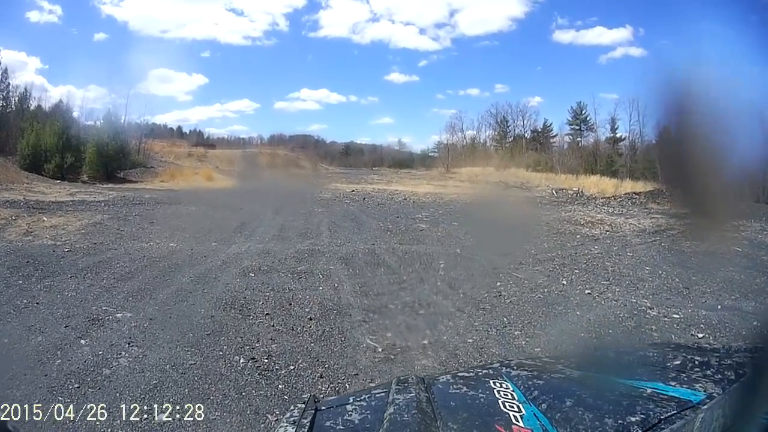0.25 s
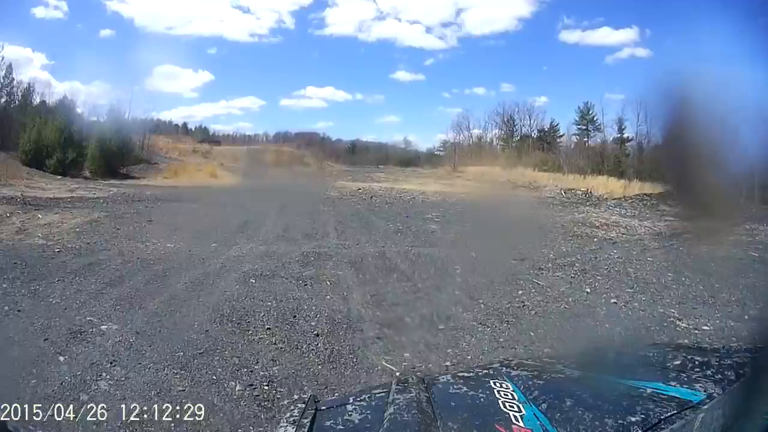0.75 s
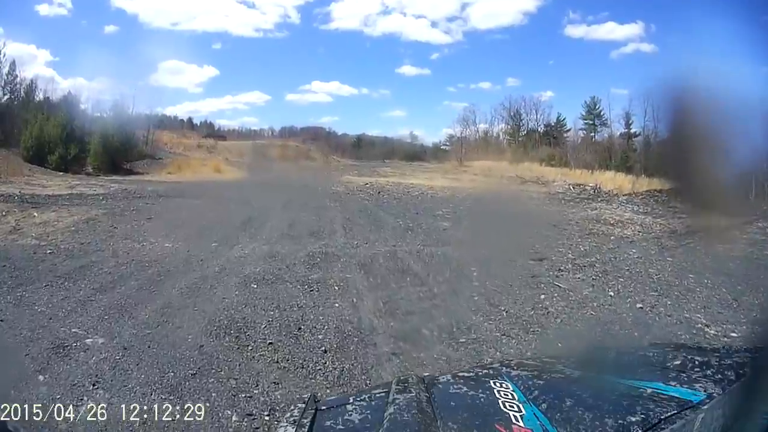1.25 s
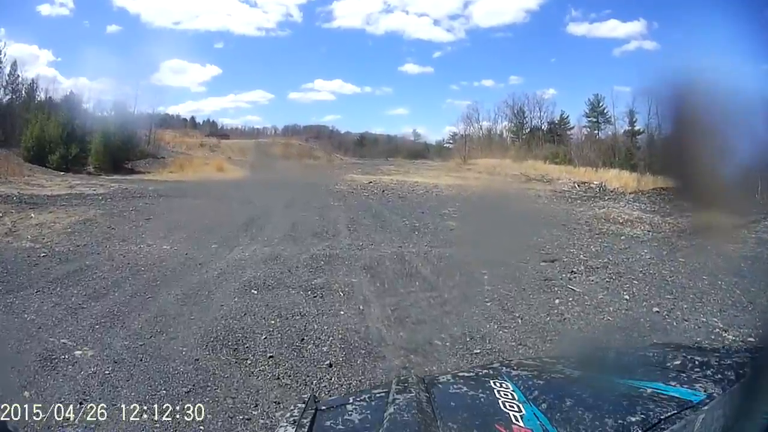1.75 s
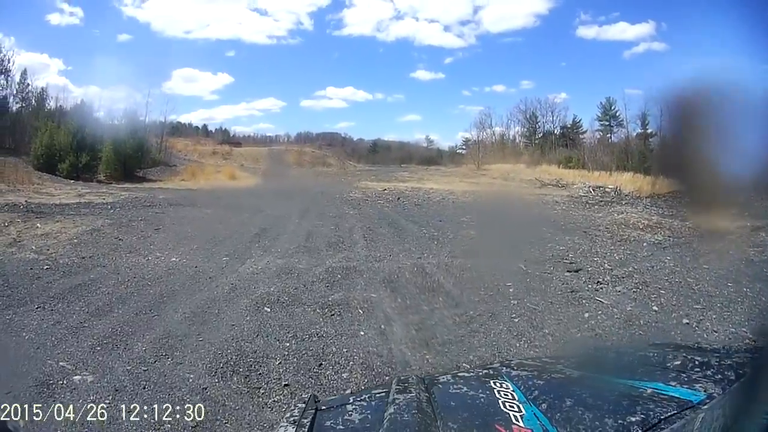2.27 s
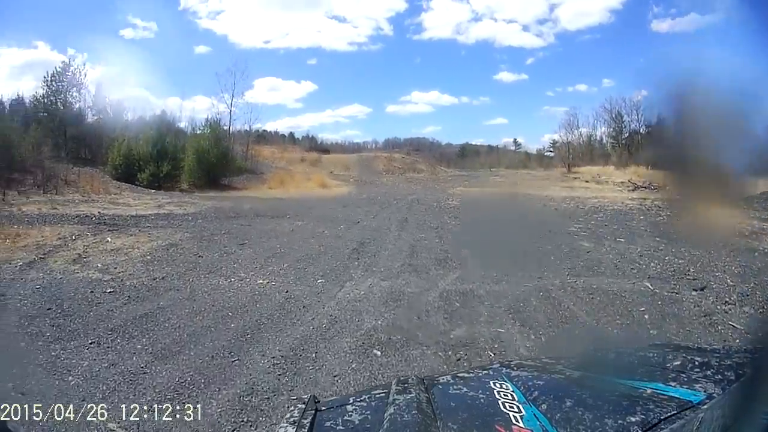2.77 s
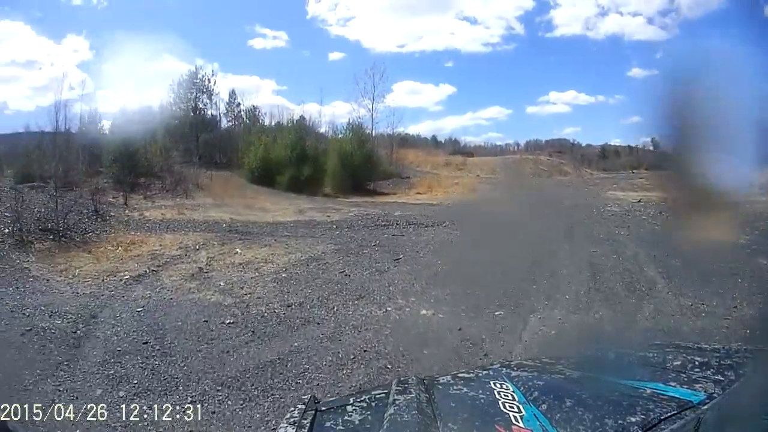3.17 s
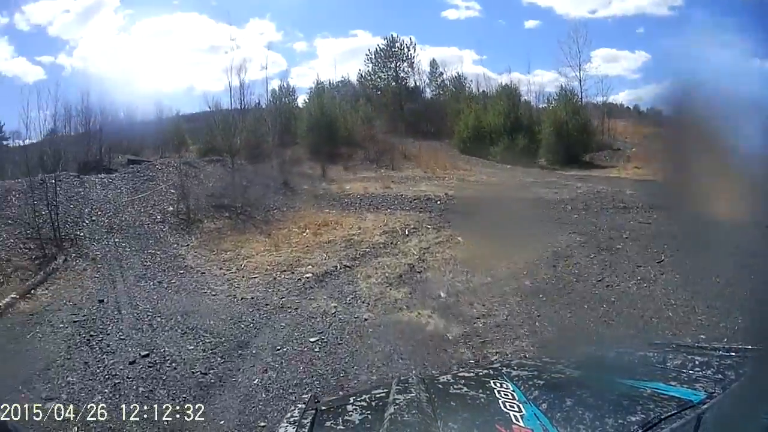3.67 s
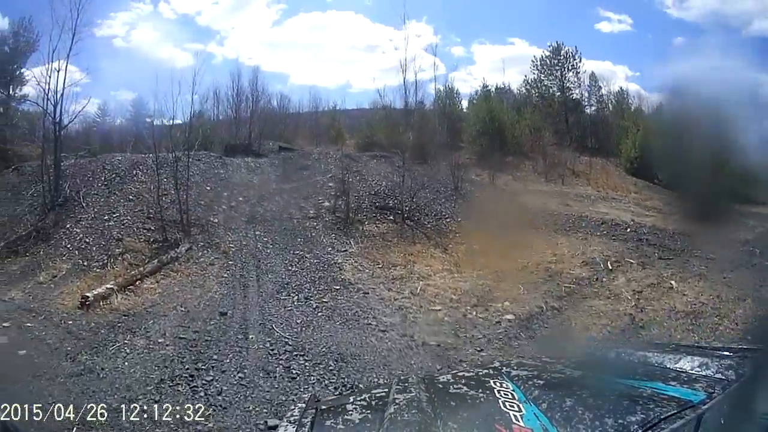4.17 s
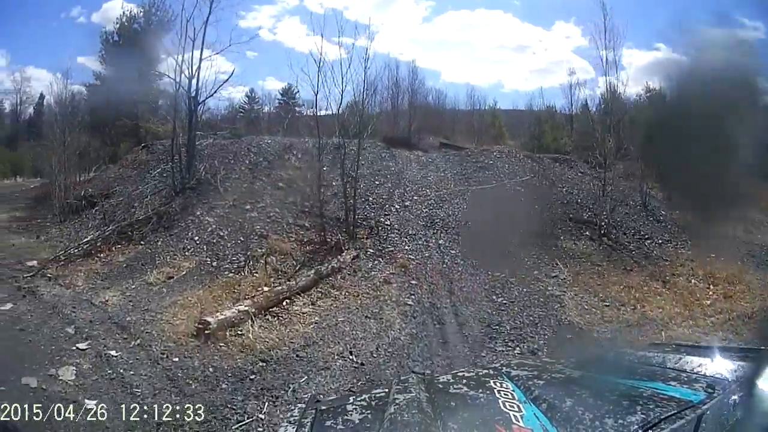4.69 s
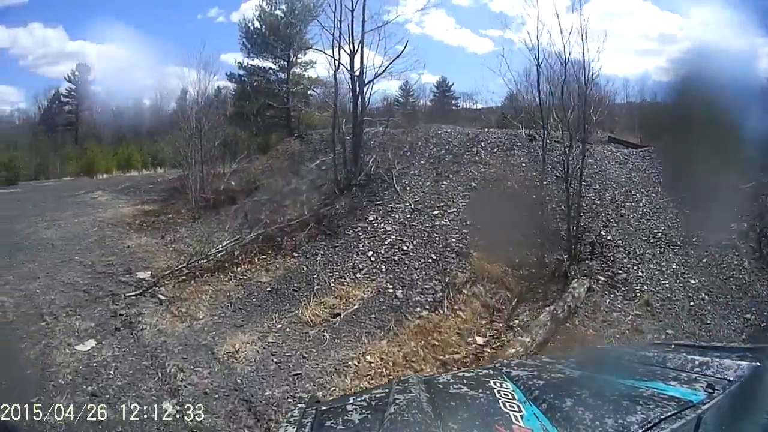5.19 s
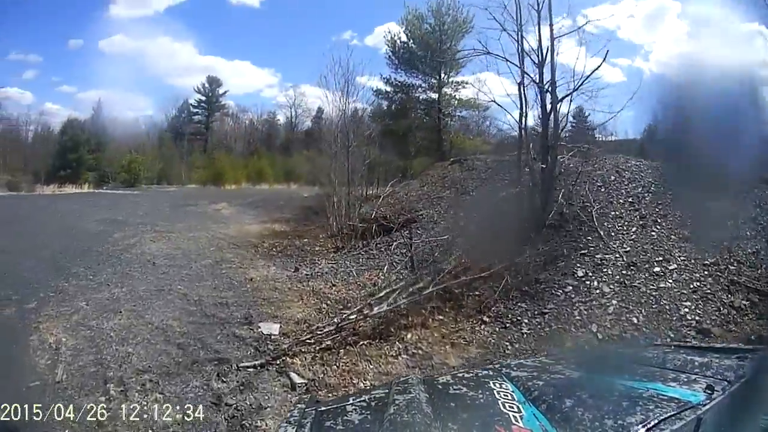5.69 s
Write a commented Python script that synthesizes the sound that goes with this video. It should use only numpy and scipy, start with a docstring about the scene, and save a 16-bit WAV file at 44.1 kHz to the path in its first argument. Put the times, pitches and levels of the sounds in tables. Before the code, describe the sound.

A small single-cylinder off-road buggy engine chugs, drops to a buzzing idle, revs hard, then eases and pulls again over knocking gravel.

```python
"""A one-cylinder four-stroke buggy engine on a gravel trail, heard by a camera shut in a case on its frame.
It runs steady, drops to idle, revs high, eases and pulls again. Its firings shake the frame as low tones
at multiples of the firing rate, and its clatter is throbbing noise that rings the modes of the case.
A panel buzzes, slack parts tick, gears whine and small parts rattle; stones and loose parts knock the case.
Low filtered noise is the rumble of tyres and frame, and the preamplifier adds a faint hiss."""
import sys
import numpy as np
from scipy import signal
from scipy.fft import rfft, irfft
from scipy.io import wavfile
from scipy.ndimage import uniform_filter1d

SR = 44100
rng = np.random.default_rng(int(sys.argv[2]) if len(sys.argv) > 2 else 0)


def output_pcm(signal):
    """Save a mono or channel-first signal as 16-bit PCM at the path in sys.argv[1].

    Samples are clipped to [-1, 1] before scaling.
    """
    pcm = np.clip(np.atleast_2d(signal).T, -1, 1) * 32767
    wavfile.write(sys.argv[1], SR, np.round(pcm).astype(np.int16))


N = 261954
TIME = np.arange(N) / SR  # seconds

# Ringing modes of the case and its mount: (frequency [Hz], width [Hz], relative level [dB])
CASE_MODES = [(330.2, 35, 3), (499.4, 50, 7), (591.5, 56.5, -6), (737.4, 70, 3.5), (1034.5, 95, -7.5),
              (1326.5, 77, -2.5), (1477, 63.3, 0), (1636, 85, -7.5), (1860, 70, -28.5), (2273, 167, -25),
              (2698, 200, -30.5), (2850, 260, -30), (3687, 113, -38), (4640, 69, -46.5), (5770, 380, -52.5)]


def amp(db):
    """Turn decibels into a plain factor."""
    return 10 ** (np.asarray(db) / 20)


def evened(x):
    """Scale a sound to an rms of 1 over its whole length."""
    return x / np.sqrt(np.mean(x ** 2) + 1e-20)


def by_value(rows, value):
    """Read each later column of a table at the given values of its first column."""
    first, *columns = np.transpose(rows)
    return [np.interp(value, first, column) for column in columns]


def drift(per_s):
    """Random wander of rms 1, heading for a new random point per_s times a second."""
    points = rng.standard_normal(1000)
    wander = np.interp(TIME * per_s, np.arange(1000), points)
    return evened(uniform_filter1d(wander, 200))


def coloured(x, points):
    """Shape the spectrum of a sound by levels in dB, joined by lines over log frequency."""
    hz, db = np.transpose(points)
    f = np.fft.rfftfreq(len(x), 1 / SR)
    gain_db = np.interp(np.log(f + 1), np.log(hz), db, left=-70, right=-90)
    return irfft(rfft(x) * amp(gain_db), len(x))


def ring(x, hz, width):
    """One ringing mode, with a gain of 1 at its centre; a narrow mode rings longer."""
    b, a = signal.iirpeak(hz, hz / max(width, 5), SR)
    return signal.lfilter(b, a, x)


def case(x, tilt_db=0):
    """The walls of the case ring in many modes; tilt_db is added for each octave above 1 kHz."""
    total = 0
    for k, (hz, width, db) in enumerate(CASE_MODES):
        sign = (-1) ** k  # neighbouring modes swing opposite ways
        level = amp(db + tilt_db * np.log2(hz / 1000))
        total = total + sign * level * ring(ring(x, hz, 3 * width), hz, width)
    return total


def upper(x, tilt_db):
    """The ringing of the case, with what lies below about 2 kHz filtered out."""
    high_pass = signal.butter(6, 2000, "high", fs=SR, output="sos")
    return signal.sosfilt(high_pass, case(x, tilt_db))


def wide(x):
    """The part of a sharp blow that passes between the high modes, as a broad band."""
    band = signal.butter(3, [1800, 4000], "band", fs=SR, output="sos")
    return signal.sosfilt(band, x)


def blows(rows, length_s):
    """Each blow is a burst of random-signed pushes that dies away; rows are (time [s], level [dB])."""
    out, t = np.zeros(N + 2000), np.arange(2000) / SR
    for s, db in rows:
        start = round(s * SR)
        pushes = rng.choice([-1., 1.], 2000)
        out[start:start + 2000] += amp(db) * pushes * np.exp(-t / length_s)
    return out[:N]


def rumble():
    """Tyres and frame rumble: steady random noise, strongest at low pitch."""
    # Colour of the rumble: (frequency [Hz], relative level [dB])
    rumble_colour = [(8.8, -51), (15, -24.5), (41, 4), (64, 6), (108, 1.5), (155, 1), (298, -6), (343, -16),
                     (413, -12), (450, -25.5), (580, -52), (990, -120)]
    return evened(coloured(rng.standard_normal(N), rumble_colour))


def grit(cycles):
    """Dense small rattles come in clumps, bunched just after each crank turn."""
    bunching = .5 + np.exp(-(2 * cycles % 1 - .1) ** 2 / 0.002)
    hits_per_s = 800 * amp(1.8 * drift(per_s=40.)) * bunching
    happens = rng.random(N) < hits_per_s / SR
    size = amp(2.5 * np.minimum(rng.exponential(1, N), 3)) * happens
    fading = signal.lfilter([1], [1, -np.exp(-1 / (0.0011 * SR))], size)  # dies away in about 1 ms
    hits = fading * rng.standard_normal(N)
    return evened(evened(upper(hits, tilt_db=5.)) + .4 * evened(wide(hits)))


def ticks():
    """Stones and slack parts rattle the upper modes for a moment; metal pings ring one high mode."""
    # Sharp ticks: (time [s], blow strength [dB], strength of the sharp part over the blow [dB])
    tick_rows = [(0.0284, -45, 1), (0.5655, -51, 27.5), (0.6472, -51.5, 20), (1.514, -50.5, 3),
                 (1.8594, -47, 5), (1.8944, -45, -2), (2.0347, -37.5, 8), (2.1415, -42, 2),
                 (2.478, -42, -7), (2.575, -41, 0), (2.6535, -38.5, 13), (2.7167, -34.5, -2),
                 (2.795, -33, 12), (2.9652, -32, 6.5), (3.049, -40.5, -2), (3.146, -37.5, -3),
                 (3.311, -39, -14), (3.3861, -27.5, -19), (3.466, -39, 8), (3.509, -39, 2),
                 (3.5393, -36.5, 9), (3.5819, -45, -8), (4.1954, -43.5, 2), (4.46, -36, -6),
                 (4.502, -38, -8), (4.535, -34.5, 3), (4.8463, -37.5, 4), (4.91, -43.5, 0), (5.001, -37, 6),
                 (5.021, -38, -3), (5.1838, -38, 8), (5.254, -40.5, 5), (5.3324, -39, 9), (5.433, -36.5, 5),
                 (5.5013, -35.5, 25.5), (5.5717, -40, -14), (5.6516, -37, 9), (5.7032, -44, 0),
                 (5.8586, -38.5, 0), (5.877, -41, -5)]
    # Thin high pings of metal on metal: (time [s], blow strength [dB])
    ping_rows = [(0.109, -69), (2.7527, -68), (3.061, -71), (3.0779, -71), (3.1084, -70), (3.1882, -67),
                 (3.2136, -66.5), (3.831, -71), (5.5028, -69), (5.6197, -69), (5.6787, -64), (5.6955, -70)]
    dull_blows = blows([(s, db) for s, db, _ in tick_rows], length_s=0.0074)
    sharp_blows = blows([(s, db + up) for s, db, up in tick_rows], length_s=.0004)
    dull = amp(26.5) * upper(dull_blows, tilt_db=3.0)
    sharp = amp(-10) * wide(sharp_blows)
    pings = amp(15.0) * ring(blows(ping_rows, length_s=0.0025), 7600, 1500)
    return dull + sharp + pings


def knocks():
    """A blow from the ground rings the whole case, thumps its low wall and rocks the frame briefly."""
    # Dull knocks: (time [s], blow strength [dB], low thud level [dB])
    knock_rows = [(1.045, -54, -60), (1.854, -37.5, -42), (1.914, -29, -44), (2.038, -40, -41),
                  (2.142, -38, -53), (3.384, -26, -26), (4.002, -26.5, -45), (5.339, -34, -71),
                  (5.431, -26.5, -18.5)]
    rap = amp(13) * case(blows([(s, db) for s, db, _ in knock_rows], length_s=.004), tilt_db=-2)
    push = np.zeros(N)
    for s, _, thud_db in knock_rows:
        push[round(s * SR)] = amp(thud_db)
    t = np.arange(4000) / SR
    swell = (t / .022) ** 3 * np.exp(3 - 3 * t / .022)  # rises to 1 at 22 ms, then dies away
    rock = np.sin(2 * np.pi * 72 * t) * swell
    thump = np.sin(2 * np.pi * 420 * t) * np.exp(-t / 0.0011)
    return rap + signal.oaconvolve(push, rock + amp(4.0) * thump)[:N]


def panel(cycles):
    """A loose panel, loudest with the clutch out, buzzes as an unsteady, slowly sinking tone with a scrape."""
    start_s, rise_s, end_s, fall_s = .9, .25, 1.79, .15
    rest_db, buzz_db, after_db = -66, -55, -80
    start_hz, sag_hz_per_s = 624, 14
    corners = [start_s - rise_s, start_s, end_s, end_s + fall_s]
    level_db = np.interp(TIME, corners, [rest_db, buzz_db, buzz_db, after_db])
    hz = start_hz - sag_hz_per_s * (TIME - start_s)  # the pitch sinks a little
    unsteady_hz = hz * (1 + .011 * drift(per_s=25.))
    waver_db = 1.2 * drift(per_s=30.) + 1.2 * drift(per_s=5.6)
    swell = (1 + 0.47 * np.cos(4 * np.pi * cycles)) * amp(waver_db)  # once a crank turn
    tone = swell * np.sin(2 * np.pi * np.cumsum(unsteady_hz) / SR)
    scrape = ring(ring(rng.standard_normal(N), 640, 40), 653, 90)
    return amp(level_db) * evened(evened(tone) + .55 * evened(scrape))


def slack(hz, cycles):
    """A slack part ticks once a crank turn near the low pulling speed, each tick of its own strength."""
    centre_hz, width_hz = 21.2, .6  # firings a second at which it ticks
    strength_db, spread_db, idle_turn_db = -46, 6, -7  # softer on the turn without a firing
    delay = .12  # part of an engine cycle
    crank = np.floor(2 * (cycles - delay))
    near = np.exp(-((hz - centre_hz) / width_hz) ** 2)
    size_db = strength_db + idle_turn_db * (crank % 2) + spread_db * rng.uniform(-1, 1, N)
    size = np.diff(crank, prepend=-1) * near * amp(size_db)
    fading = signal.lfilter([1], [1, -np.exp(-1 / (.002 * SR))], size)  # dies away in about 2 ms
    hits = fading * rng.choice([-1., 1.], N)
    return wide(hits) + amp(10) * upper(hits, tilt_db=0.) + amp(8) * case(hits)


def gears(hz):
    """Gear teeth whine as the engine winds up: a rough tone that swells as it crosses the case modes."""
    teeth = 34.7  # tooth meetings per firing
    start_s, end_s, drive_db = 2.8, 3.3, -34
    rise_db_per_s, fall_db_per_s = 324, 250
    before_db = rise_db_per_s * np.maximum(start_s - TIME, 0)
    after_db = fall_db_per_s * np.maximum(TIME - end_s, 0)
    level_db = drive_db - before_db - after_db + 2.1 * drift(per_s=47.0)
    tooth_hz = teeth * hz * (1 + 0.01205 * drift(per_s=140.0))
    tone = np.sin(2 * np.pi * np.cumsum(tooth_hz) / SR)
    return case(amp(level_db) * tone)


def hum(drive):
    """The four lowest case modes ring on longer, each swelling and sinking by itself."""
    total = 0
    for hz, width, db in CASE_MODES[:4]:
        level = amp(db + 3 * drift(per_s=14.))
        total = total + level * ring(ring(drive, hz, width), hz, .45 * width)
    return evened(total)


def clatter_drive(cycles):
    """Noise that throbs with each crank turn, plus one click a firing, to set the case ringing."""
    throb = 1.3 + np.exp(-(2 * cycles % 1) / .35) * amp(3 * drift(per_s=60.))
    firings = np.diff(np.floor(cycles), prepend=0) * amp(3.3 * drift(per_s=45.))
    return evened(throb * rng.standard_normal(N)) + .3 * evened(firings)


def clatter(drive):
    """Engine clatter is the ringing of the case, with broader noise filling in between its modes."""
    # Colour of the noise between the modes: (frequency [Hz], relative level [dB])
    between_modes = [(200, 2), (300, -8.5), (420, -11), (900, -28.5), (1180, -32), (1500, -25),
                     (1900, -27.5), (3000, -40.5), (4000, -57.5)]
    return evened(evened(case(drive)) + amp(-7.5) * evened(coloured(drive, between_modes)))


def shake(hz, push, cycles, clatter_db):
    """Firings shake the frame in tones at multiples of the firing rate, which crest together."""
    # Which multiples of the firing rate sound: one number for each tone
    multiples = (1, 2, 3, 4, 5, 6, 10)
    # Shake at half throttle; under 20 firings a second the clutch lets go:
    # (firings a second [Hz], then the relative level [dB] of each multiple)
    shake_rows = [(15, -66, -55, -47, -37, -56, -52, -66), (19.5, -62, -50, -40, -36, -55, -55, -60),
                  (20.8, -61, -32, -50, -47, -51, -40, -55), (26, -53, -30, -45, -52, -51, -51, -60),
                  (31, -52, -30, -48, -49, -39.5, -48, -51), (40, -46, -39, -48, -47, -40, -51, -54),
                  (47, -38, -40, -48, -35, -39, -50, -49), (51, -35, -46, -36, -28, -41, -53, -50)]
    # Lift of each multiple from shut to full throttle: one value [dB] for each
    throttle_lifts = (0, 7, 16, 15, 6, 9, 0)
    # Weaker tones that follow the clatter: (multiple of the firing rate, level over the clatter [dB])
    weak_rows = [(7, -18.5), (8, -15)]
    tones = [(k, db + lift_db * push)
             for k, db, lift_db in zip(multiples, by_value(shake_rows, hz), throttle_lifts)]
    tones += [(k, clatter_db + db) for k, db in weak_rows]
    steadiness = np.minimum(hz / 24.0, 1) ** 2  # the levels waver less at low speed
    total = 0
    for k, level_db in tones:
        waver_db = (1.5 + 0.21 * k) * steadiness * drift(per_s=24.)  # higher tones waver more
        phase = 2 * np.pi * k * cycles + 0.47 * drift(per_s=8.)
        total = total + np.sqrt(2) * amp(level_db + waver_db) * np.cos(phase)
    return amp(-0.5) * total


def engine():
    """Speed and throttle drive the shake, clatter and other layers; one cycle is a firing and two turns."""
    # The drive: (time [s], firings a second [Hz], throttle [0-1])
    engine_rows = [(0, 21.05, .4), (.71, 20.8, .3), (.82, 19.3, .1), (1.3, 15.9, 0), (1.78, 15, 0),
                   (1.9, 20.8, .9), (2.05, 25.5, .6), (2.36, 31.4, 1), (2.66, 33.4, 1), (3.02, 46.6, 1),
                   (3.25, 51, 1), (3.34, 49.6, 0), (3.62, 35.5, 0), (3.8, 26.5, .35), (3.94, 24.3, .55),
                   (4.25, 30.9, .75), (5.05, 32.1, .4), (5.57, 35.1, .4), (5.68, 32.6, .6),
                   (5.94, 22.6, .35)]
    # Noisy layers at half throttle: (firings a second [Hz], clatter level [dB], hum of the low
    # modes level [dB], rumble level [dB], grit level [dB])
    rough_rows = [(16, -56.5, -68.5, -48.5, -74), (19.45, -54, -62.5, -42, -72),
                  (24.9, -49, -54, -39, -65.5), (31.23, -42, -44, -38.5, -69.5),
                  (40, -37, -47.5, -35.5, -72), (51.6, -34, -42.5, -35, -62.5)]
    # Moments when rattle and clatter swell or sink:
    # (middle [s], half length [s], rattle change [dB], clatter change [dB])
    moment_rows = [(0, .3, 0, -0.5), (0.608, 0.049, 4, 0.5), (1.87, 0.14, 4.5, 5.5), (2.6, 0.18, 2.5, 2),
                   (3.2, .15, 8.5, 0.5), (4.017, 0.042, 9.5, 5.5), (4.13, 0.085, -2.5, 4.5),
                   (4.51, 0.31, 3.5, 4), (5.68, 0.14, 10.5, 2.5)]
    hz, throttle = by_value(engine_rows, TIME)
    push = throttle - .5
    clatter_db, hum_db, rumble_db, grit_db = by_value(rough_rows, hz)
    # dB from shut to full throttle
    clatter_db = clatter_db + 2.5 * push
    hum_db = hum_db - 2 * push
    rumble_db = rumble_db + 4.5 * push
    grit_db = grit_db + 5.5 * push
    for middle_s, half_s, rattle_change_db, clatter_change_db in moment_rows:
        moment = np.exp(-((TIME - middle_s) / half_s) ** 2)
        grit_db = grit_db + rattle_change_db * moment
        clatter_db = clatter_db + clatter_change_db * moment
    cycles = np.cumsum(hz * (1 + 0.006 * drift(per_s=25.))) / SR  # the firing rate wavers a little
    drive = clatter_drive(cycles)
    noises = amp(rumble_db) * rumble() + amp(grit_db) * grit(cycles)
    parts = panel(cycles) + slack(hz, cycles) + gears(hz)
    ringing = amp(hum_db) * hum(drive) + amp(clatter_db) * clatter(drive)
    return noises + parts + ringing + shake(hz, push, cycles, clatter_db)


def scene():
    """Add ticks and knocks to the engine, with a very short fade in."""
    fade_in = np.minimum(np.arange(N) / 150, 1)
    return (ticks() + knocks() + engine())[None] * fade_in


def record(dry):
    """Preamplifier hiss joins, gain control lifts quiet stretches a little, then the top is cut off."""
    hiss_db, edge_hz = -72.5, 15680  # hiss level is before its filter
    treble = signal.butter(1, [3000, 19000], "band", fs=SR, output="sos")
    hiss = amp(hiss_db) * signal.sosfilt(treble, rng.standard_normal(dry.shape))
    power_db = 10 * np.log10(uniform_filter1d(dry ** 2, 9000) + 1e-12)
    lift_db = np.clip(.8 * (-35 - power_db), 0, 2.2)
    lifted = (dry + hiss) * amp(lift_db)
    padded = np.pad(lifted, ((0, 0), (1000, 1000)), "reflect")  # room for the filter at both ends
    low_pass = signal.firwin(2001, edge_hz, window=("kaiser", 10), fs=SR)
    return signal.oaconvolve(padded, low_pass[None], "valid")


dry = scene()
out = record(dry)
output_pcm(out)
```